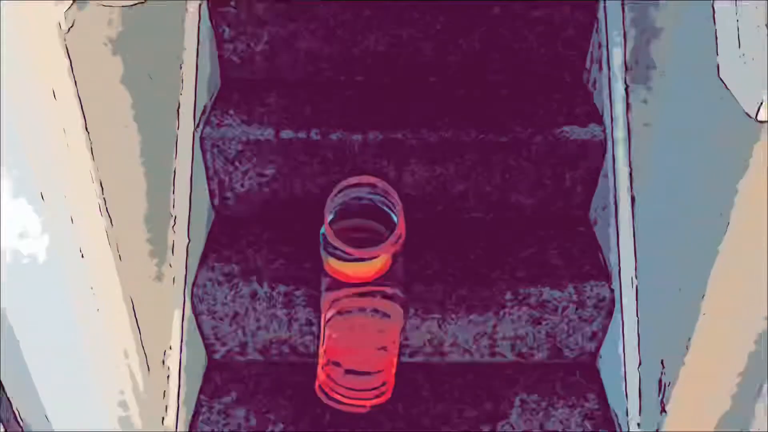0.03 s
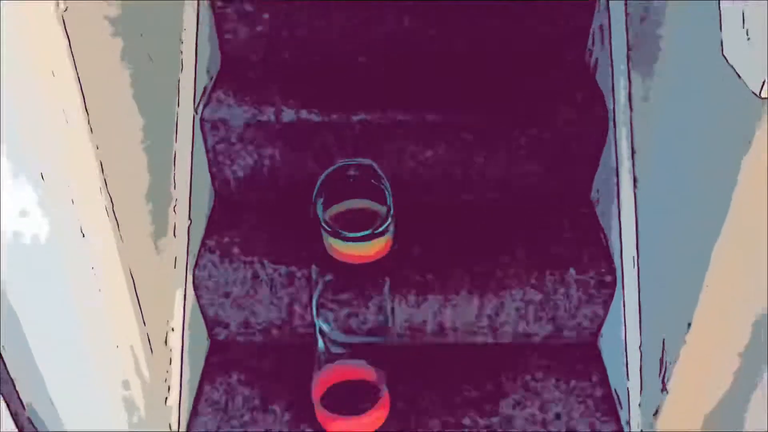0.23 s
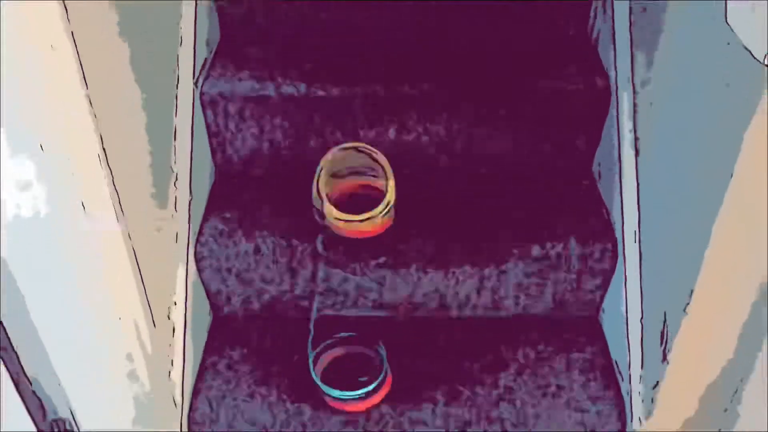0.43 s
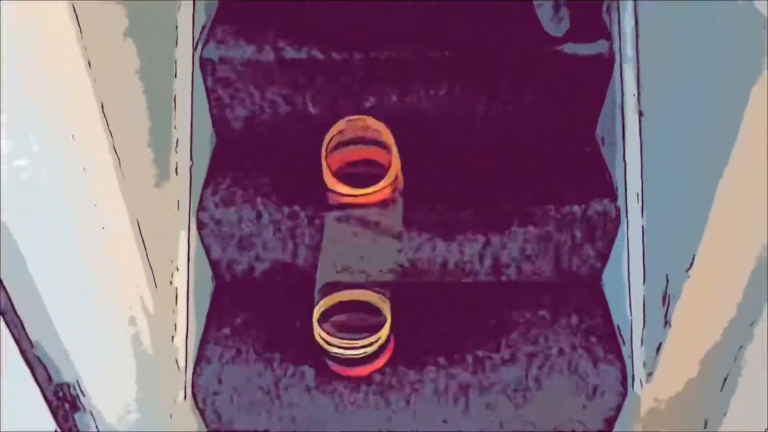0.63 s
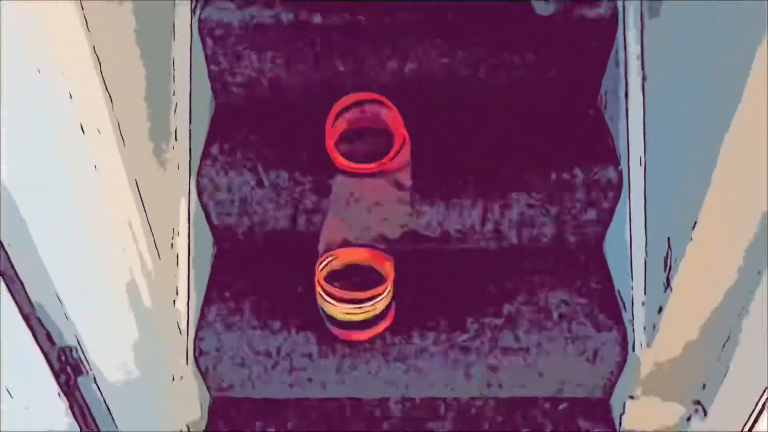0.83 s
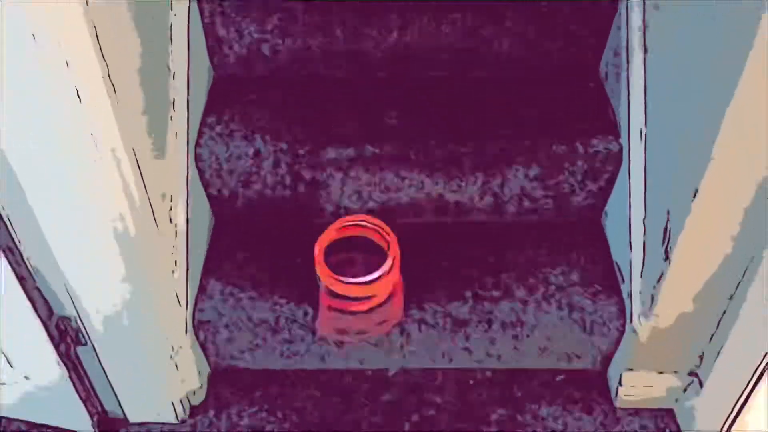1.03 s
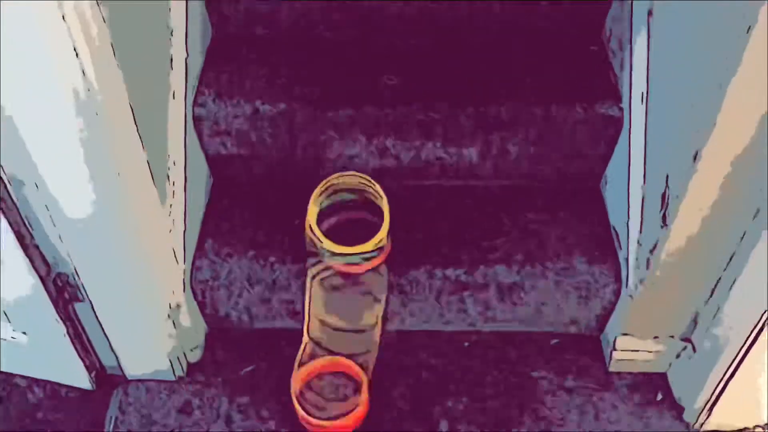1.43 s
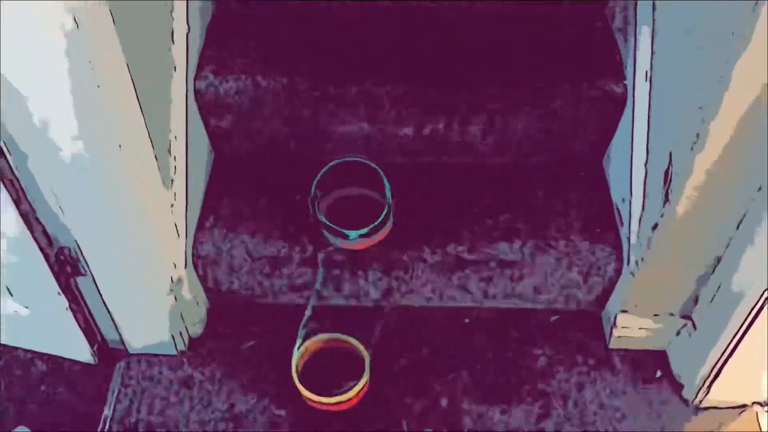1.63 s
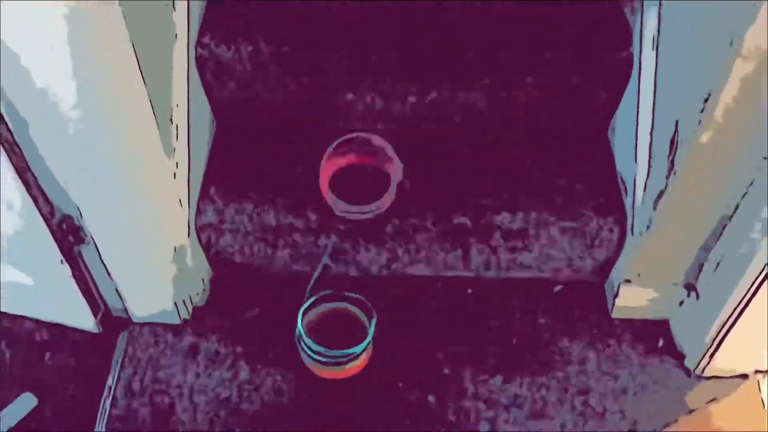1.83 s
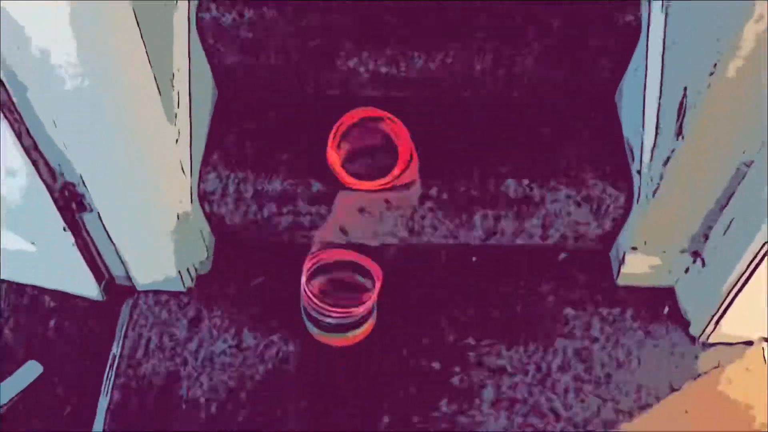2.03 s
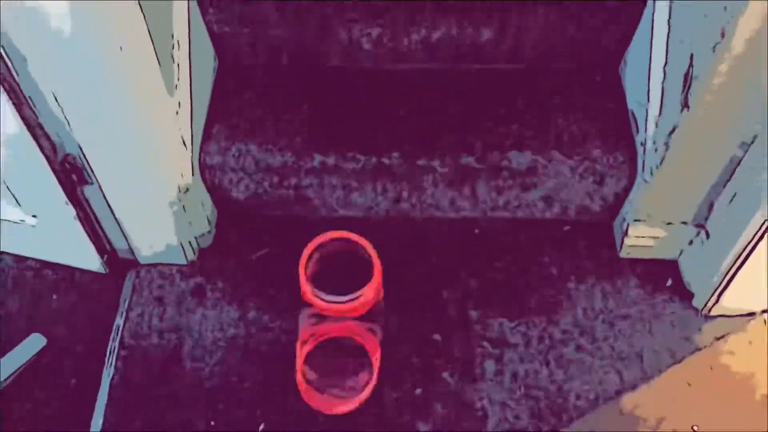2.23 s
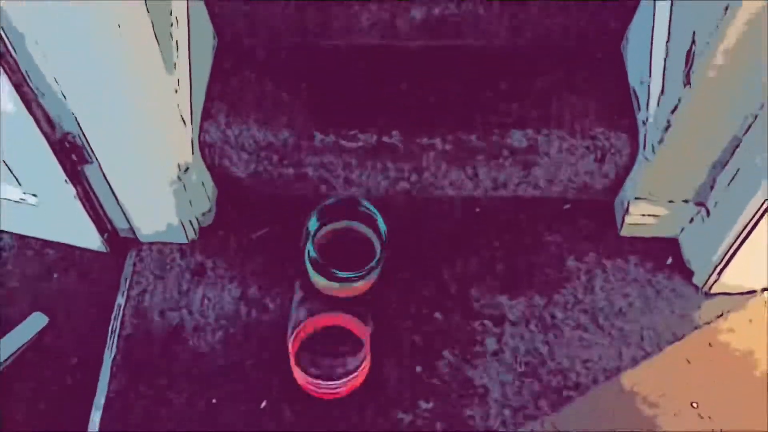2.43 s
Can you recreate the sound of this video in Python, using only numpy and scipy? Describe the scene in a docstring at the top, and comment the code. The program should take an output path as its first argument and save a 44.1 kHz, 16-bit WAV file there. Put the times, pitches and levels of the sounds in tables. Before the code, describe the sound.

A metal coil toy walks down carpeted stairs in a house. Its turns clash in two long, bright, fluttering rustles with small clicks and dull landing thumps, then a last knock and a shorter, quieter rustle on the floor.

```python
"""Carpeted stairs in a house: a metal coil toy walks down and ends on the floor.
Its turns peel off one stack and clash onto the other in a bright, fluttering rustle.
The landing stack rings lower as it grows, the closed stack ticks as it tips, the stretched spring hums.
At each flip the free end lands with a thump; the stairs boom under the heavier ones.
A deep rumble and a faint hiss lie underneath."""
import sys
import numpy as np
from scipy import signal
from scipy.fft import rfft, irfft
from scipy.io import wavfile
from scipy.ndimage import uniform_filter1d

SR = 44100
rng = np.random.default_rng(int(sys.argv[2]) if len(sys.argv) > 2 else 0)


def dump_mix(stems):
    """Bounce the given channels to the path in sys.argv[1] as a 16-bit WAV at rate SR."""
    frames = np.atleast_2d(stems).T  # one column per channel
    limited = np.clip(frames, -1, 1)  # hard clip at full scale
    pcm = np.round(limited * 32767).astype(np.int16)
    wavfile.write(sys.argv[1], SR, pcm)


N = 114660
TIME_S = np.arange(N) / SR

# Clash force of the turns. Each row: time in seconds, relative level in dB.
CLASH_FORCE = [(0, -49), (.04, -58), (.055, -49), (.078, -72), (.09, -47), (.131, -49), (.139, -34),
               (.2, -38), (.42, -42), (.52, -38.5), (.78, -40.5), (.86, -38), (.94, -44), (1.0, -50),
               (1.08, -52.5), (1.17, -49), (1.235, -58.5), (1.265, -49), (1.289, -54), (1.3, -35.5),
               (1.39, -42.5), (1.9, -39.5), (2.04, -41.5), (2.11, -46), (2.27, -49), (2.3, -46),
               (2.41, -51), (2.48, -48), (2.6, -48)]
# Standout clashes. Each row: start in seconds, level in dB.
ACCENTS = [(0.134, -24.5), (0.165, -30), (0.827, -31.5), (0.844, -39), (1.2934, -24), (1.332, -31.5),
           (1.786, -28.5), (2.132, -39), (2.171, -31.5), (2.282, -31.5), (2.304, -32.5), (2.386, -38.5),
           (2.476, -36), (2.501, -34.5), (2.525, -34), (2.57, -35.5)]
# Spectrum of the clashing wire. Each row: frequency in Hz, relative gain in dB.
WIRE_COLOUR = [(1500, -25), (2800, -4.5), (4200, -1.5), (4900, -5), (5900, -0.5), (7200, -6.5), (8600, -2),
               (9600, -3), (10400, -9), (11800, -1), (15600, -0.5)]
# Rustle midrange. Each row: time in seconds, level in dB.
MID_LEVEL = [(.07, -60), (.14, -39), (.27, -44), (.55, -46.5), (.96, -50.5), (1.02, -57), (1.24, -63.5),
             (1.3, -41.5), (1.42, -47), (2.05, -49), (2.25, -60), (2.3, -48.5), (2.41, -52)]
# Midrange spectrum. Each row: frequency in Hz, relative gain in dB.
MID_COLOUR = [(200, -3), (450, -1.5), (660, 3), (900, -1), (1400, 0), (2100, 0), (2900, -6), (4500, -8.5)]
# Lone wire-on-wire clicks. Each row: start in seconds, level in dB.
CLICKS = [(.491, -16.5), (0.8404, -9.5), (0.862, -9), (.980, -17.5), (1.0118, -14.5), (1.014, -14),
          (1.047, -21), (1.172, -23.5), (1.183, -22), (1.273, -14), (1.482, -14.5), (1.933, -12.5),
          (2.022, -13)]
# Tick and click spectrum. Each row: frequency in Hz, relative gain in dB.
TICK_COLOUR = [(2000, -31), (4500, -6), (14000, -2.5)]
# Landings, hard ones on several rows. Each row: start in seconds, drive in dB, pitch in Hz, T60 in seconds.
LANDINGS = [(.101, -38, 429, 0.059), (0.136, -25.5, 247, 0.081), (0.159, -21, 94, 0.034),
            (.252, -30, 149, 0.042), (.69, -36, 142.6, 0.15), (.969, -10.5, 177, 0.031),
            (.969, -37, 716, 0.036), (.968, -9.5, 80, 0.029), (1.2453, -28.5, 360, 0.014),
            (1.293, -23, 289, 0.053), (1.294, -31.5, 651, 0.063), (2.2169, -15, 510, 0.0088),
            (2.2171, -36.5, 985, 0.036), (2.233, -24, 457, 0.024)]
# Low modes of spring and stairwell. Each row: frequency in Hz, gain in dB, T60 in seconds.
BODY_MODES = [(152, -7.5, 0.2), (223.3, -4, 0.1), (275.5, 1, 0.12), (309, -2, 0.086), (358.5, -8, 0.095),
              (458, -7.5, 0.068)]
# Hum of the stretched spring. Each row: time in seconds, level in dB.
HUM_LEVEL = [(0, -79), (.07, -50), (.14, -45.5), (.3, -48), (.55, -50), (.8, -47), (1.05, -49),
             (1.22, -61.5), (1.31, -46.5), (2.13, -50.5), (2.25, -55), (2.31, -45.5), (2.4, -53.5),
             (2.6, -50.5)]
# Hollow resonance of the landing stack. Each row: time in seconds, frequency in Hz, level in dB.
STACK_RESONANCE = [(.1, 5030, -78), (.55, 3320, -50), (.74, 2580, -51.5), (.79, 2000, -48.5),
                   (.94, 1930, -53), (1.05, 1890, -84), (1.52, 3450, -56), (1.8, 2900, -52),
                   (2.2, 1680, -60.5)]
# Partials of that resonance. Each row: frequency ratio, gain in dB.
STACK_PARTIALS = [(1.0, 0), (2.1, -6)]
# Tipping of the closed stack. Each row: start in seconds, end in seconds, level in dB.
TIPPING = [(1.016, 1.206, -52.5), (2.136, 2.347, -52.5)]
# Closed-stack modes. Each row: frequency in Hz, relative gain in dB, T60 in seconds.
CLOSED_MODES = [(4370, 2, 0.013), (5800, 7.5, 0.0037)]
# Deep rumble. Each row: time in seconds, level in dB.
RUMBLE_LEVEL = [(0, -50.5), (.12, -51), (.26, -42), (.33, -54), (.6, -50.5), (.72, -42), (.9, -52.5),
                (1.12, -47), (1.25, -58), (2.6, -63.5)]
# Rumble spectrum. Each row: frequency in Hz, relative gain in dB.
RUMBLE_COLOUR = [(50, 4.5), (130, -8), (600, -32)]


def rustle(turns, force_gain_db=3, mid_flutter_exponent=0.58, ring_db=-9.5):
    """Clashing turns and lone clicks set the wire ringing."""
    start_s, db = np.transpose(ACCENTS)
    force = from_db(force_gain_db) * envelope(CLASH_FORCE) * turns
    force = np.hypot(force, chatter(impulses(start_s, from_db(db))))
    bright = colour(force * vary_bands(contacts()), WIRE_COLOUR)
    mid_force = envelope(MID_LEVEL) * turns ** mid_flutter_exponent
    middle = colour(mid_force * vary_bands(contacts()), MID_COLOUR)
    wire = bright + middle + ticks()
    return wire + from_db(ring_db) * tail(wire, t60_s=0.27, delay_s=0.0017)


def flutter(turns_per_s=52, jitter_turns=.22, spread_db=1.1, sliding=.6):
    """Unit-rms force: turns fall on the stack one by one, over steady sliding."""
    count = 300
    timing, strength = rng.standard_normal((count, 2)).T
    start_s = (np.arange(count) + jitter_turns * timing) / turns_per_s
    return unit_rms(sliding + chatter(impulses(start_s, from_db(spread_db * strength))))


def chatter(spikes, attack_s=.0008, decay_s=.0036):
    """Clash envelope: flares at once, dies in milliseconds."""
    t = TIME_S[:SR // 10]
    shape = (1 - np.exp(-t / attack_s)) * np.exp(-t / decay_s)
    return signal.fftconvolve(spikes, shape / shape.max())[:N]


def contacts(rate_per_s=14000, spread_db=2.5):
    """Dense, uneven micro-contacts of wire on wire."""
    sizes = from_db(spread_db * np.minimum(rng.exponential(1, N), 4.5))
    signs = rng.choice([-1, 1], N)
    return unit_rms(sizes * signs * (rng.random(N) < rate_per_s / SR))


def vary_bands(x, spread_db=1.5, changes_per_s=90):
    """Colour varies from clash to clash: bands swell and fade separately."""
    spectrum, hz = rfft(x), np.fft.rfftfreq(N, 1 / SR)
    bands = (np.sqrt(hz) // 11).astype(int)
    knots_db = spread_db * rng.standard_normal((bands.max() + 1, 1000))
    gains = [from_db(np.interp(TIME_S * changes_per_s, np.arange(len(row)), row)) for row in knots_db]
    return sum(gain * irfft(spectrum * (bands == k), N) for k, gain in enumerate(gains))


def ticks(rate_per_s=90, force_gain_db=19):
    """Wires meet at hard, thin points: a patter of ticks, some loud clicks."""
    spikes = rng.uniform(.3, 1, N) * (rng.random(N) < rate_per_s / SR)
    patter = from_db(force_gain_db) * envelope(CLASH_FORCE) * spikes
    start_s, db = np.transpose(CLICKS)
    return colour(snap(patter + impulses(start_s, from_db(db))), TICK_COLOUR)


def snap(spikes, t60_s=.007):
    """Hard touch: a sharp crack, then a brief buzz."""
    decay = np.exp(-2 * np.log(1000) * TIME_S[:SR // 20] / t60_s)
    buzz_power = np.abs(signal.fftconvolve(spikes ** 2, decay / decay.sum())[:N])
    return spikes + np.sqrt(buzz_power) * rng.standard_normal(N)


def thumps():
    """The free end lands: cushioned knocks that boom in the stairwell."""
    knocks = 0
    for start_s, db, hz, t60_s in LANDINGS:
        cushion = signal.butter(3, [hz * 0.28, hz * 3.13], "band", fs=SR, output="sos")
        impact = impulses([start_s], [from_db(db)])
        knocks = knocks + signal.sosfilt(cushion, ring(impact, hz, t60_s))
    return knocks + stairwell(knocks)


def spring_hum(turns):
    """Falling turns shake the stretched spring."""
    return envelope(HUM_LEVEL) * unit_rms(body(turns * contacts()))


def body(x):
    """Low modes of spring and stairwell, alternating in polarity."""
    return sum((-1) ** k * from_db(db) * ring(x, hz, t60_s)
               for k, (hz, db, t60_s) in enumerate(BODY_MODES))


def growing_stack(turns, width_hz=520):
    """The tube of landed turns lengthens, so its resonances sink during each step."""
    time_s, hz, db = np.transpose(STACK_RESONANCE)
    phase = 2 * np.pi * np.cumsum(np.interp(TIME_S, time_s, hz)) / SR
    hollow = 0
    for ratio, partial_db in STACK_PARTIALS:
        # Swept band-pass: shift down, low-pass, shift back.
        carrier = np.exp(1j * ratio * phase)
        lowpass = signal.butter(2, ratio * width_hz / 2, fs=SR, output="sos")
        baseband = signal.sosfilt(lowpass, turns * contacts() / carrier)
        hollow = hollow + from_db(partial_db) * unit_rms((baseband * carrier).real)
    return from_db(np.interp(TIME_S, time_s, db)) * hollow


def closed_stack(touches_per_s=170):
    """Packed turns tick thinly against each other as the stack tips."""
    gate = sum(from_db(db) * ((TIME_S > start_s) & (TIME_S < end_s)) for start_s, end_s, db in TIPPING)
    touches = snap(rng.random(N) * (rng.random(N) < touches_per_s / SR))
    ringing = sum(from_db(db) * ring(touches, hz, t60_s) for hz, db, t60_s in CLOSED_MODES)
    return uniform_filter1d(gate, size=SR // 100) * unit_rms(ringing)


def stairwell(x, early_db=-5.5, boom_db=-3.5, boom_top_hz=325, modes_db=-85):
    """Short early reflections, then a dull boom: only the lows linger."""
    lows = signal.sosfilt(signal.butter(3, boom_top_hz, fs=SR, output="sos"), x)
    early = from_db(early_db) * tail(x, t60_s=0.14, delay_s=.006)
    boom = from_db(boom_db) * tail(lows, t60_s=0.34, delay_s=0.014)
    return early + boom + from_db(modes_db) * body(x)


def background(hiss_db=-74):
    """Deep rumble, faint hiss."""
    rumble, hiss = rng.standard_normal((2, N))
    return envelope(RUMBLE_LEVEL) * colour(rumble, RUMBLE_COLOUR) + from_db(hiss_db) * hiss


def from_db(db):
    """Decibels to gain."""
    return 10 ** (np.asarray(db) / 20)


def unit_rms(x):
    """Scale to rms 1."""
    return x / np.sqrt(np.mean(x ** 2) + 1e-20)


def envelope(rows):
    """Gain over time from (s, dB) points."""
    time_s, db = np.transpose(rows)
    return from_db(np.interp(TIME_S, time_s, db))


def impulses(times_s, heights):
    """One spike at each time."""
    samples = np.clip(np.asarray(times_s) * SR, 0, N).astype(int)
    return np.bincount(samples, heights, N + 1)[:N]


def colour(x, points, size=2 ** 13):
    """Minimum-phase, unit-energy filter shaped by (Hz, dB) points."""
    hz, db = np.transpose(points)
    grid_hz = np.maximum(np.fft.rfftfreq(size, 1 / SR), 1)
    gain = from_db(np.interp(np.log(grid_hz), np.log(hz), db))
    cepstrum = irfft(np.log(gain))
    causal = 2 * cepstrum[:size // 2] * (np.arange(size // 2) > 0)
    response = irfft(np.exp(rfft(causal, size)))
    return signal.fftconvolve(x, response / np.linalg.norm(response))[:N]


def ring(x, hz, t60_s):
    """One mode: a unit spike starts a decaying sine of height 1."""
    r = np.exp(-np.log(1000) / (t60_s * SR))
    w = 2 * np.pi * hz / SR
    return signal.lfilter([0, r * np.sin(w)], [1, -2 * r * np.cos(w), r * r], x + 1e-18)


def tail(x, t60_s, delay_s):
    """Unit-energy decay of dense modes or reflections."""
    t = TIME_S[:SR // 2]
    response = rng.standard_normal(len(t)) * np.exp(-np.log(1000) * t / t60_s) * (t > delay_s)
    return signal.fftconvolve(x, response / np.linalg.norm(response))[:N]


def scene():
    """The coil on the stairs, mono; one flutter drives rustle, growing stack and hum."""
    turns = flutter()
    coil = rustle(turns) + growing_stack(turns) + closed_stack() + spring_hum(turns)
    return (coil + thumps() + background())[None]


def record(dry, low_hz=40, high_hz=16000):
    """Band limit: deepest bass removed, top cut steeply."""
    highpassed = signal.sosfilt(signal.butter(5, low_hz, "high", fs=SR, output="sos"), dry)
    taps = signal.firwin(401, high_hz, fs=SR, window=("kaiser", 8))
    return signal.fftconvolve(highpassed, taps[None], "same", axes=1)


dry = scene()
out = record(dry)
dump_mix(out)
```